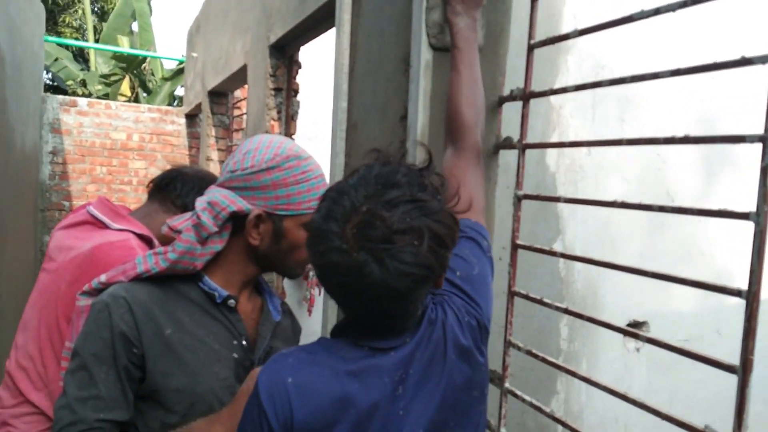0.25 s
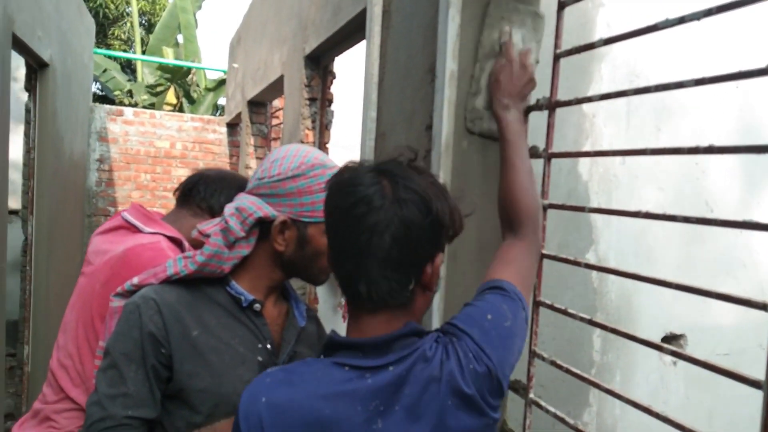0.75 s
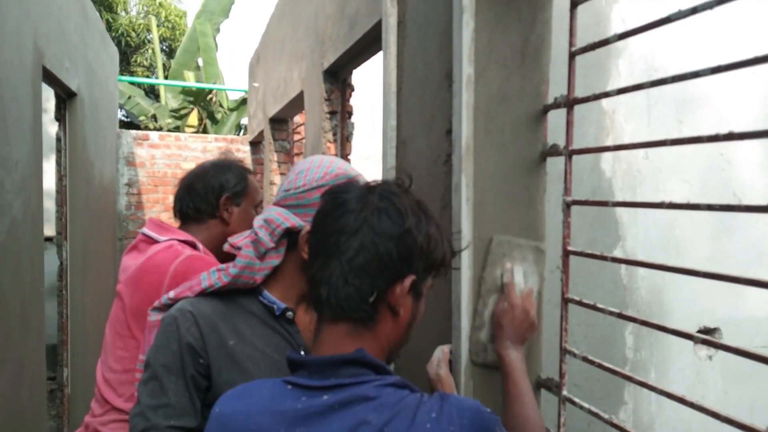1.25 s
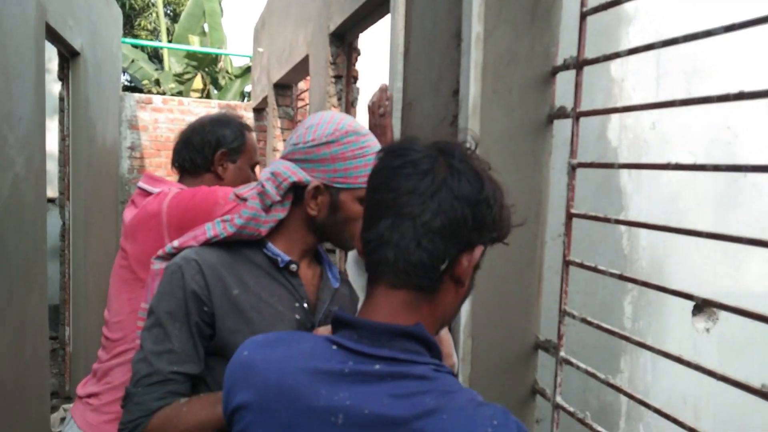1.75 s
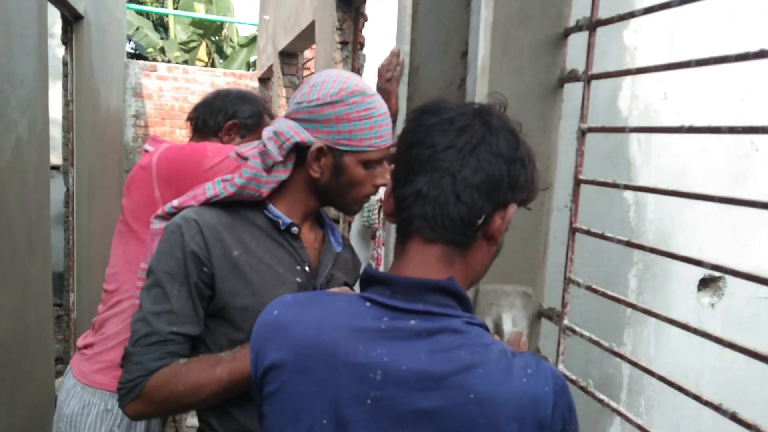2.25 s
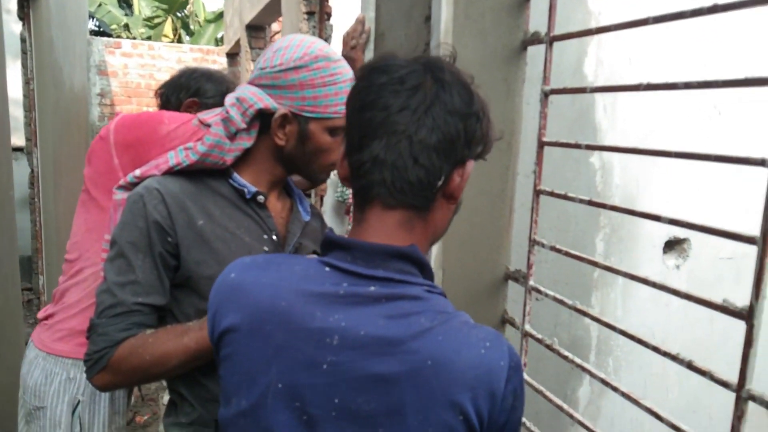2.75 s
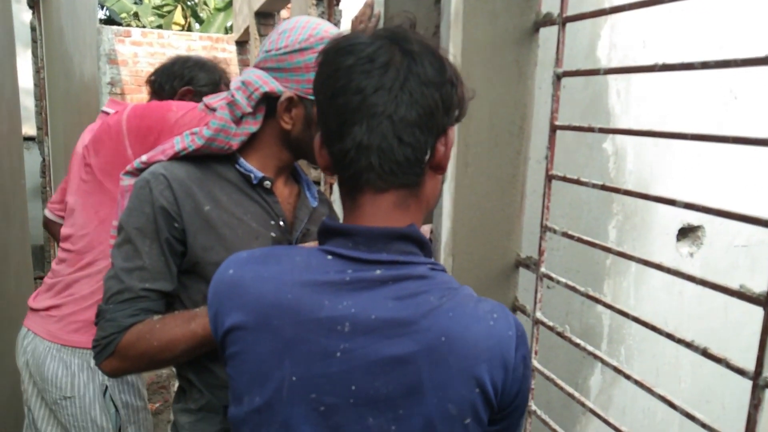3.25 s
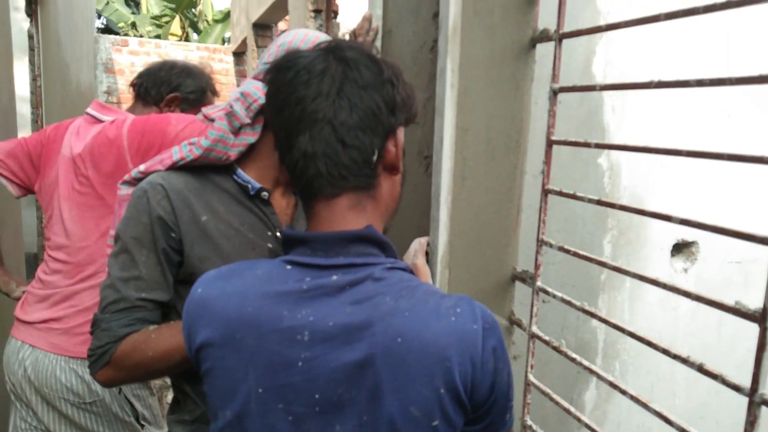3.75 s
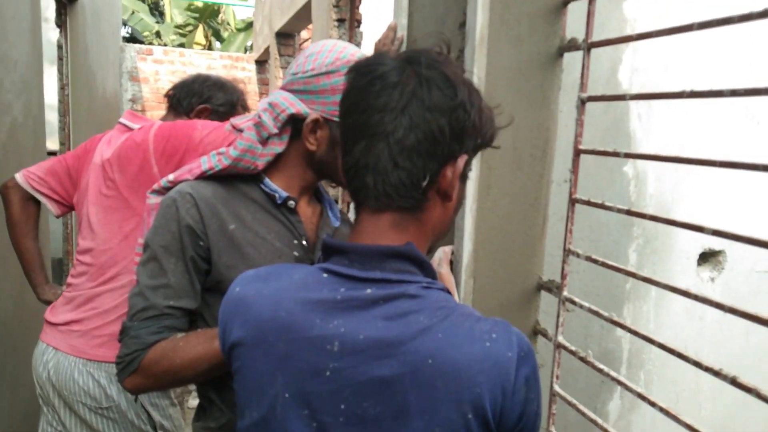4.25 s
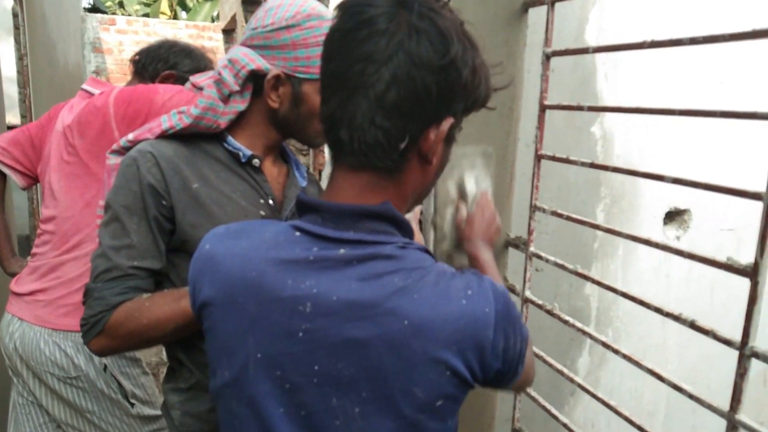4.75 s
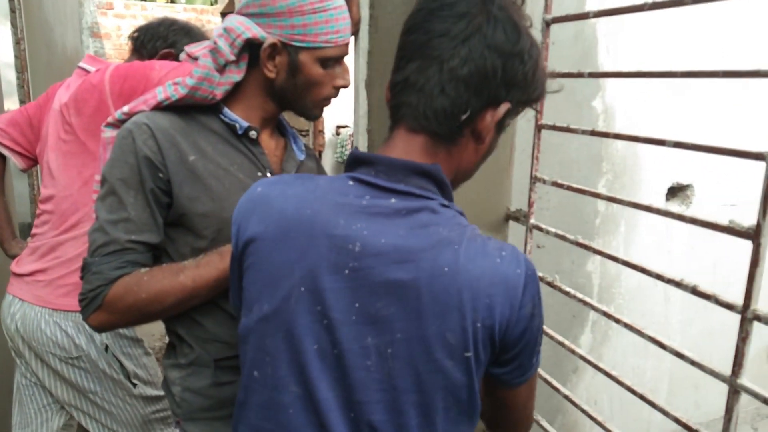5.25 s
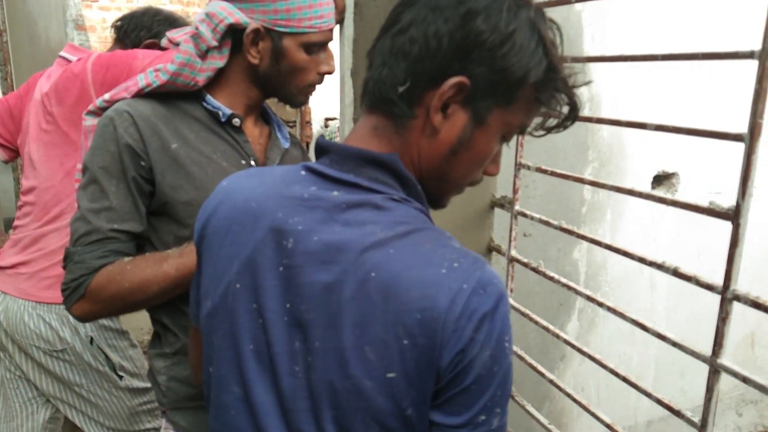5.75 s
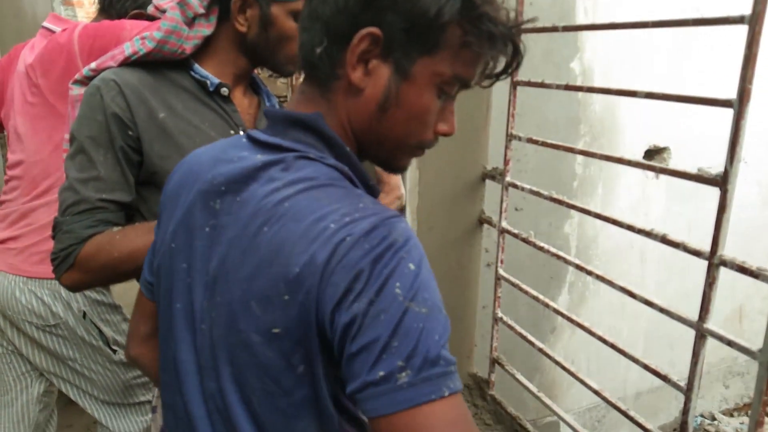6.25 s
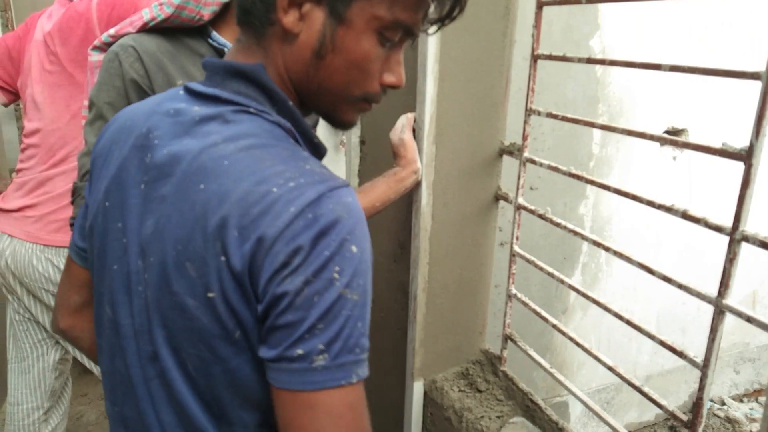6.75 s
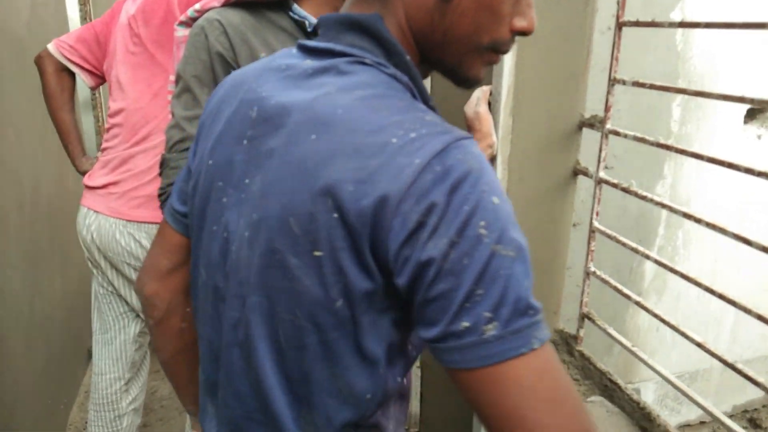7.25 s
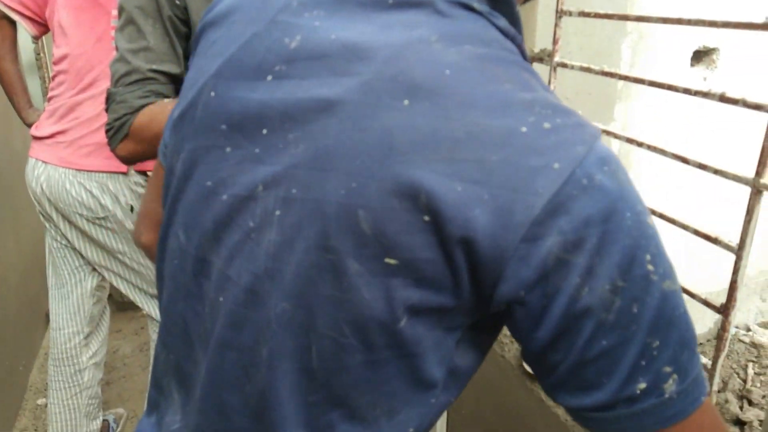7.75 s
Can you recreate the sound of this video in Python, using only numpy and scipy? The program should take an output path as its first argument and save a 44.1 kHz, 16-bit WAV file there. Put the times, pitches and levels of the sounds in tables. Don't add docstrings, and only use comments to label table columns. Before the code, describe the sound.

Bright, hissing scrapes of sand under a thin ringing blade, heard near the microphone with a short bare-wall echo. Pebbles tick early, the strokes smooth out, then turn choppy and grittier with clicking stones. A clear rising bird chirp, soft distant coos and whistles follow as scraping thins. One tool raps a plank, then mortar is scooped with gravelly crunches. Faint regular distant thumps, footfalls and shuffles sit beneath, gated by noise reduction.

```python
import sys
import numpy as np
from scipy import signal
from scipy.fft import rfft, irfft, next_fast_len
from scipy.io import wavfile
from scipy.ndimage import uniform_filter1d, map_coordinates

SR = 44100
rng = np.random.default_rng(int(sys.argv[2]) if len(sys.argv) > 2 else 0)


def convert_level_to_amplitude(level_db):
    exponent = np.asarray(level_db, float) / 20
    return 10 ** exponent


def output_pcm(signal):
    pcm = np.clip(np.atleast_2d(signal).T, -1, 1) * 32767
    wavfile.write(sys.argv[1], SR, np.round(pcm).astype(np.int16))


N = 353152
HISS_DB = -53.5

# freq_hz, level_db_per_hz
HISS_SPECTRUM = [(25, 3.5), (150, -6), (600, -13), (1700, -8.5), (2500, -12.5), (3200, -5.5), (4500, -8.5),
                 (6500, -21.5), (16000, -45)]
# freq_hz, level_db_per_hz
MURMUR_SPECTRUM = [(25, -7.5), (60, 4), (120, -4), (280, -3.5), (400, -18.5), (1200, -23.5), (3000, -78)]
# freq_hz, t60_s
WALL_DECAY = [(200, 0.078), (2000, 0.46), (3800, 0.78), (6000, 0.54), (12000, 0.23)]
# delay_s, level_db
FIRST_RETURNS = [(.009, -10), (.017, -10), (.028, -13), (.041, -15)]

# start_s, slap_db, thump_db
RAMMER = [
    (0, -60.5, -54.5),
    (0.679, -44.5, -49),
    (1.507, -51.5, -48),
    (2.315, -48, -45),
    (3.17, -76, -50.5),
    (3.96, -44, -41.5),
    (4.806, -72, -54),
    (5.612, -46, -44),
    (6.446, -56.5, -52.5),
    (7.275, -82, -53),
]
# start_s, held_s, level_db
LOADS = [
    (1.55, 0.17, -47.5),
    (2.45, 0.24, -45),
    (3.05, 0.092, -55.5),
    (3.4, 0.13, -64),
    (3.76, 0.43, -43.5),
    (4.1, 0.15, -51),
    (6.555, 0.21, -41),
    (6.62, .23, -42),
]
# start_s, held_s, level_db
FOOTFALLS = [
    (.27, 0.15, -49),
    (1.27, 0.099, -59),
    (1.836, .1, -49),
    (3.39, 0.17, -65.5),
    (3.76, 0.31, -45),
    (5.076, 0.049, -52.5),
    (5.891, 0.036, -57),
    (6.1, 0.16, -63),
    (6.555, 0.078, -36),
    (7.159, 0.1, -57),
]
# start_s, held_s, mid_hz, level_db
SHUFFLES_HZ = [(.13, 0.27, 657, -50), (.4, 0.24, 850, -53), (1.03, 0.14, 560, -61.5),
               (0, 0.048, 363, -47.5), (1.95, 0.069, 1180, -62), (3.05, 0.22, 1410, -65),
               (7.27, 0.11, 715, -56.5), (3.55, 0.31, 334, -56), (4.25, 0.085, 337, -55),
               (1.191, 0.26, 666, -57.5), (1.75, 0.85, 614, -64.5), (2.6, 0.079, 565, -57.5),
               (2.9, 0.41, 634, -59.5), (3.35, 0.86, 644, -56.5), (3.55, 1, 714, -53.5),
               (3.76, 0.16, 540, -49.5), (4.12, 0.53, 690, -57.5), (4.553, 0.31, 750, -54.5),
               (4.86, 0.062, 690, -50.5), (5.05, 0.32, 630, -59.5), (5.1, 0.8, 1340, -59),
               (6.041, 0.31, 623, -64.5), (6.38, 0.37, 1190, -59.5), (6.555, 0.042, 750, -35.5),
               (6.6, 0.066, 1510, -57), (6.76, 0.093, 580, -60.5), (6.91, 0.22, 660, -62.5),
               (7.6, 0.18, 790, -58.5)]
# start_s, held_s, mid_hz, level_db
NARROW_BURSTS = [
    (8.1, 0.11, 5740, -63),
    (5.719, 0.32, 2010, -61),
    (7.87, 0.15, 4950, -56),
    (7.93, 0.11, 4500, -58),
    (7.89, .2, 3930, -58.5),
]

# start_s, length_s, start_hz, held_hz, level_db
DOVE_COOS = [
    (4.41, 0.46, 754, 753, -47),
    (5.235, 0.17, 826, 812, -41.5),
    (5.44, 0.17, 762, 783, -47.5),
    (5.735, 0.14, 797, 785, -48),
    (6.03, 0.086, 680, 690, -44.5),
]
# start_s, length_s, start_hz, held_hz, level_db
FAR_WHISTLES = [
    (5.33, 0.21, 2084, 2545, -56.5),
    (5.69, 0.0744, 2605, 2410, -54),
    (5.76, .24, 2400, 2743, -60),
    (5.98, .17, 2990, 3500, -53),
    (6.28, 0.28, 2186, 2667, -57),
    (6.58, 0.15, 2400, 2520, -55),
    (7.12, 0.19, 2650, 3100, -59),
    (7.29, 0.14, 1900, 2350, -60),
    (7.41, 0.2, 2720, 2980, -50.5),
]
# start_s, length_s, start_hz, held_hz, level_db
CHIRPS = [
    (4.795, .105, 3855, 5020, -35.5),
    (5.572, 0.027, 4350, 4680, -40),
    (6.155, .038, 4750, 5000, -43),
    (6.638, 0.032, 4020, 4600, -44),
]
# start_s, length_s, start_hz, held_hz, level_db
ANSWERS = [
    (4.9, 0.11, 3980, 3870, -44),
    (5.608, 0.082, 4530, 3834, -43.5),
    (6.19, 0.092, 4820, 3902, -41),
    (6.678, 0.084, 4580, 3795, -45.5),
]
# start_s, length_s, start_hz, held_hz, level_db
PIPES = [
    (4.525, .06, 3900, 4050, -45),
    (5.556, 0.021, 4000, 5700, -52),
    (7.68, 0.1, 3150, 3420, -46),
]

# start_s, ring_db, crack_db, hardness_hz
CONTACTS = [
    (6.5428, -10, -26, 1000),
    (6.5458, -10, -7, 5040),
    (6.5497, -16, -12, 3000),
]
# freq_hz, level_db, t60_s
PLANK_MODES = [(237, -20.5, 0.037), (447, -18, .04), (530, -11, 0.05), (776, 0, 0.015), (919, -7.5, 0.03),
               (1190, -8, .05), (1357, -2, 0.04), (1540, -1, 0.059), (1900, -15, 0.05), (2290, -13, 0.032)]

# peak_s, peak_db, pitch_hz
STONE_HITS = [(0.769, -23, 5050), (0.8724, -40, 4290), (2.607, -39, 2900), (2.9165, -39, 4690),
              (3.236, -40, 3570), (3.269, -31, 3800), (3.3021, -29, 5840), (3.6653, -32, 3660),
              (4.0659, -36, 5430), (4.1956, -23, 5290), (4.433, -39, 3540), (4.5557, -33, 4000),
              (4.6266, -23, 3740), (4.695, -27, 4420), (4.7033, -26, 4480), (4.857, -33, 4300),
              (4.897, -31.5, 3600), (6.0392, -45, 2730), (6.0703, -29, 3060), (6.075, -28, 3060),
              (6.11, -34.5, 2900), (6.5195, -31, 1600), (1.49, -32, 3400), (1.52, -34, 3310),
              (.1848, -33, 5310), (.2117, -29, 6060), (.2135, -28, 5000), (.2422, -23.5, 5290),
               (.2455, -23, 5700), (.251, -25, 5600), (.294, -30, 5500), (.298, -20, 5820),
               (.2992, -15, 5600), (.3032, -17.5, 5900), (.315, -24, 5800), (.3325, -29, 5500),
               (.3362, -21, 5400), (.338, -17, 5400), (.342, -21, 5800), (.344, -22, 6000),
               (.3533, -26, 7000), (.374, -29, 5000), (.4282, -26.5, 5360), (.4475, -34, 5920)]
# peak_s, peak_db, pitch_hz
GRAVEL_HITS = [(6.9062, -27.5, 5140), (6.9282, -24.5, 4800), (6.9437, -27, 5220), (6.9588, -15, 4200),
               (6.963, -24, 5230), (6.981, -26, 3000), (6.9855, -25, 2700), (6.994, -24, 3000),
               (6.9991, -24, 3820), (7.0022, -20.5, 3900), (7.009, -23, 4500), (7.017, -20.5, 4400),
               (7.024, -25, 5000), (7.0315, -12.5, 5100), (7.0345, -16.5, 5000), (7.0398, -15.5, 5200),
               (7.0425, -18, 5300), (7.049, -25, 5200), (7.06, -26, 4000), (7.5142, -35, 3130),
               (7.5626, -28, 3010), (7.585, -28, 4300), (7.6174, -24, 4820), (7.6224, -21, 4100),
               (7.64, -23, 5370), (7.66, -25, 4600), (7.69, -28, 2150), (7.8424, -46, 3430)]
# freq_hz, width_hz, level_db
WALL_BLADE_MODES = [(1800, 250, -9), (3600, 300, -7), (5400, 250, 0), (5950, 300, -2), (7350, 300, -3)]
# freq_hz, width_hz, level_db
HEAP_BLADE_MODES = [(2160, 120, -8), (2930, 150, -7), (3850, 200, -6), (4580, 200, -5), (5210, 110, 2),
                    (7300, 250, -8)]

# freq_hz, level_db_per_hz
SAND_SPECTRUM = [(530, -17), (900, -5.5), (1020, -14.5), (2140, -10), (2890, -1), (3150, -1.5), (4800, 3),
                 (6640, 0.5), (7960, -5.5), (15100, -21.5), (16000, -20.5)]
# freq_hz, width_hz, level_db
SAND_BLADE_MODES = [(2154, 20, 2), (2990, 13, -1.5), (3600, 21, -21.5), (4350, 200, -34), (5280, 20, 0.5),
                    (7320, 280, -10.5)]
# peak_s, rise_s, fall_s, blade_db, slurry_over_blade_db
FLAT_STROKES = [(.1, 0.13, 0.61, -47.5, -12.5), (.5, .08, 0.39, -48, -6.5), (.772, 0.015, 0.12, -43, -8.5),
                (.875, .015, 0.21, -43.5, -12), (1.1, 0.31, 0.08, -45, -5.5),
                (1.34, 0.28, 0.23, -43.5, -7.5), (1.52, 0.22, 0.12, -41.5, -12.5),
                (1.76, 0.2, 0.11, -45.5, -27), (1.94, 0.06, 0.16, -42.5, -24),
                (2.19, 0.12, 0.18, -41.5, -17.5), (2.3, 0.1, 0.21, -43.5, -10.5),
                (2.62, 0.16, 0.29, -39.5, -15), (2.92, 0.025, 0.39, -43.5, -19),
                (3.14, 0.25, 0.13, -47, -21), (5.02, .06, 0.088, -55.5, -30), (5.21, 0.11, 0.14, -44, -18),
                (5.43, 0.26, 0.13, -48, -10)]
# peak_s, rise_s, fall_s, blade_db, slurry_over_blade_db
EDGE_STROKES = [(3.303, 0.0028, 0.13, -42.5, -12.5), (3.38, 0.053, 0.13, -44, -9.5),
                (3.58, 0.11, 0.058, -41.5, -4), (3.71, 0.077, 0.16, -41, -5.5),
                (3.84, 0.046, 0.21, -49, -15), (3.964, 0.016, 0.15, -46, -5.5),
                (4.17, 0.12, 0.38, -45, -11), (4.359, 0.42, 0.14, -46, -7.5),
                (4.565, 0.023, 0.18, -44, -16), (4.69, 0.084, 0.12, -44.5, -4),
                (4.87, 0.056, 0.093, -44, -9)]
# peak_s, rise_s, fall_s, blade_db, slurry_over_blade_db
SCOOP_STROKES = [(5.62, 0.054, 0.11, -60.5, 2), (5.95, 0.12, 0.11, -56.5, -27), (6.701, .12, .1, -59, -12),
                 (6.08, 0.035, 0.08, -46, -7.5), (6.22, 0.037, 0.13, -52, -4),
                 (6.82, 0.055, 0.091, -51.5, -12), (6.95, 0.028, 0.055, -45.5, -3),
                 (7.02, 0.09, 0.065, -36, -8), (7.15, 0.072, 0.043, -56.5, -5),
                 (7.24, .08, 0.052, -65, -30), (7.32, 0.026, 0.19, -55, -15), (7.5, 0.12, 0.1, -50.5, -33),
                 (7.648, 0.084, 0.061, -35.5, -6.5), (7.78, 0.089, 0.062, -56, -2)]
# peak_s, rise_s, fall_s, blade_db, slurry_over_blade_db
STONY_STROKES = [
    (.21, 0.03, .025, -53, -1),
    (.248, 0.012, 0.033, -47, -1),
    (.32, 0.035, 0.07, -48, -4),
    (.435, 0.012, 0.046, -55, -5),
]
# grit_over_blade_db, fizz_over_blade_db
GRIP_LEVELS = [
    (-8.5, -17),
    (-3, -11),
    (-9, -16.5),
    (3.5, 1),
]


def unit(x):
    return x / np.sqrt(np.mean(x ** 2) + 1e-20)


def along(points, hz):
    f, v = np.transpose(points)
    return np.interp(np.log(hz + 1), np.log(f + 1), v)


def wobble(rate_hz, count=N):
    knots = rng.standard_normal(int(count * rate_hz / SR) + 4)
    coarse = map_coordinates(knots, [np.arange(0, count + 32, 32) * rate_hz / SR])
    return np.interp(np.arange(count) / 32, np.arange(len(coarse)), coarse)


def filtered(x, response):
    m = next_fast_len(len(x) + min(len(x), SR // 4))
    return irfft(rfft(x, m) * response(np.fft.rfftfreq(m, 1 / SR)), m)[:len(x)]


def band(hz, low_hz, high_hz, order):
    return 1 / np.sqrt((1 + (low_hz / (hz + 1)) ** order) * (1 + (hz / high_hz) ** order))


def resonance(hz, mode_hz, width_hz):
    return 1j * hz * width_hz / (mode_hz ** 2 - hz ** 2 + 1j * hz * width_hz)


def patchy(x, depth_db, bins, frames):
    z = signal.stft(x, nperseg=512)[2]
    field = uniform_filter1d(rng.standard_normal(z.shape), bins, 0)
    field = uniform_filter1d(field, frames, 1)
    return signal.istft(z * convert_level_to_amplitude(depth_db * unit(field)), nperseg=512)[1][:N]


def shaped_noise(spectrum):
    return unit(filtered(rng.standard_normal(N), lambda f: convert_level_to_amplitude(along(spectrum, f))))


def walls(x):
    hz, t, z = signal.stft(rng.standard_normal(SR // 2), SR, nperseg=256)
    decay = convert_level_to_amplitude(-60 * t / along(WALL_DECAY, hz)[:, None])
    tail = signal.istft(z * decay, SR, nperseg=256)[1]
    return signal.fftconvolve(np.pad(x, (300, 0)), tail / np.linalg.norm(tail))[:N]


def site_bursts():
    rows = []
    for s, slap_db, thump_db in RAMMER:
        rows += [(s, 0.15, 340, 1215, slap_db), (s, 0.13, 163, 295, thump_db)]
    rows += [(s, held_s, 43, 200, db) for s, held_s, db in LOADS]
    rows += [(s, held_s, 125, 345, db) for s, held_s, db in FOOTFALLS]
    for table, span in ((SHUFFLES_HZ, 1.427), (NARROW_BURSTS, 1.03)):
        rows += [(s, held_s, hz / span, hz * span, db) for s, held_s, hz, db in table]
    return rows


def site():
    out, t = np.zeros(N + SR), np.arange(SR * 3 // 4) / SR
    for s, held_s, low_hz, high_hz, db in site_bursts():
        tilt = lambda f: band(f, low_hz, high_hz, order=24) / (f + 100) ** 0.76
        noise = unit(filtered(rng.standard_normal(len(t)), tilt))
        sag_db = -7 * np.minimum(t / held_s, 1)
        close_db = -140 * np.maximum(t - held_s, 0)
        gate = (1 - np.exp(-t / 0.0067)) * convert_level_to_amplitude(sag_db + close_db)
        out[round(s * SR):][:len(t)] += convert_level_to_amplitude(db) * gate * noise
    thuds = patchy(out[:N], depth_db=2.5, bins=2, frames=10)
    hiss = patchy(shaped_noise(HISS_SPECTRUM), depth_db=1.4, bins=3, frames=30)
    return thuds + convert_level_to_amplitude(HISS_DB) * hiss


def phrases(rows, peak_share, end_ratio, start_db, end_db):
    out = []
    for s, length_s, start_hz, hz, db in rows:
        peak_s = peak_share * length_s
        bend_hz = start_hz + 0.8 * (hz - start_hz)
        out.append([(s, start_hz, db + start_db), (s + peak_s * 2 / 3, bend_hz, db),
                    (s + peak_s, hz, db), (s + length_s, hz * end_ratio, db + end_db)])
    return out


def notes(tables, blur, flutter_db, overtone_db, edge_s):
    out = np.zeros(N)
    for rows in tables:
        s, hz, db = np.transpose(rows)
        start, stop = round(s[0] * SR), min(N, round(s[-1] * SR))
        t = np.arange(start, stop) / SR
        pitch_hz = np.interp(t, s, hz) * (1 + blur * wobble(140, count=len(t)))
        phase = 2 * np.pi * np.cumsum(pitch_hz) / SR
        fade = np.clip(np.minimum(t - t[0], t[-1] - t) / edge_s, 0, 1)
        level_db = np.interp(t, s, db) + 0.5 + flutter_db * wobble(70, count=len(t))
        tone = np.sin(phase) + convert_level_to_amplitude(overtone_db) * np.sin(2 * phase)
        out[start:stop] += convert_level_to_amplitude(level_db) * fade * tone
    return out


def dove():
    coos = phrases(DOVE_COOS, peak_share=0.2, end_ratio=0.97, start_db=1, end_db=-13)
    return notes(coos, blur=0.012, flutter_db=4.5, overtone_db=-30, edge_s=0.025)


def far_birds():
    rises = phrases(FAR_WHISTLES, peak_share=0.7, end_ratio=1.04, start_db=1, end_db=-4.5)
    return notes(3 * rises, blur=0.03, flutter_db=4.5, overtone_db=-40, edge_s=0.025)


def near_bird():
    song = phrases(CHIRPS, peak_share=0.5, end_ratio=0.945, start_db=-15, end_db=-8)
    song += phrases(ANSWERS, peak_share=0.12, end_ratio=0.965, start_db=-12, end_db=-8)
    song += phrases(PIPES, peak_share=0.7, end_ratio=1.04, start_db=-10, end_db=-6)
    direct = notes(song, blur=0.006, flutter_db=3, overtone_db=-38.5, edge_s=0.003)
    return direct + sum(convert_level_to_amplitude(db) * np.roll(direct, round(s * SR)) for s, db in FIRST_RETURNS)


def dulled(x):
    return filtered(x, lambda f: (1 / (1 - (f / 7000) ** 2 + 1j * f / 6000)) ** 2)


def knock():
    rest_s, rest_db, rest_fade_s = 6.5545, -13, 0.002
    out, t = np.zeros(N + SR), np.arange(SR // 5) / SR
    for s, ring_db, crack_db, hardness_hz in CONTACTS:
        ring = np.zeros(len(t))
        for hz, db, t60_s in PLANK_MODES:
            drive = 1 / (1 + (hz / hardness_hz) ** 4)
            ring += drive * convert_level_to_amplitude(db - 60 * t / t60_s) * np.sin(2 * np.pi * hz * t)
        ring *= convert_level_to_amplitude(rest_db * np.clip((s + t - rest_s) / rest_fade_s, 0, 1))
        ring *= 1 - np.exp(-t / 0.00089)
        puff = rng.standard_normal(len(t)) * (convert_level_to_amplitude(-60 * t / 0.014) + convert_level_to_amplitude(-15.5 - 60 * t / 0.12))
        crack = filtered(puff, lambda f: 1 / (1 + 1j * f / 3300) ** 2)
        out[round(s * SR):][:len(t)] += convert_level_to_amplitude(ring_db) * ring + convert_level_to_amplitude(crack_db) * crack
    return dulled(out[:N])


def stones():
    out, t = np.zeros(N + SR), np.arange(SR // 16) / SR
    hits = [(row, WALL_BLADE_MODES) for row in STONE_HITS]
    hits += [(row, HEAP_BLADE_MODES) for row in GRAVEL_HITS]
    for (s, peak_db, pitch_hz), modes in hits:
        blow = rng.standard_normal(len(t)) * (convert_level_to_amplitude(-60 * t / 0.01) + convert_level_to_amplitude(-14 - 60 * t / 0.045))
        blow[1] = 5
        gains = [2.5 * convert_level_to_amplitude(db + rng.normal(0, 3)) for _, _, db in modes]

        def response(f):
            stone = resonance(f, pitch_hz, 900) + 0.45 * resonance(f, 4000, 5000)
            return stone + sum(g * resonance(f, hz, width) for g, (hz, width, _) in zip(gains, modes))

        burst = filtered(blow, response)
        out[round(s * SR):][:len(t)] += convert_level_to_amplitude(peak_db) * burst / np.abs(burst).max()
    return dulled(out[:N])


def pressures():
    t, power = np.arange(0, N + 64, 64) / SR, 0
    grips = (FLAT_STROKES, EDGE_STROKES, SCOOP_STROKES, STONY_STROKES)
    for strokes, (grit_db, fizz_db) in zip(grips, GRIP_LEVELS):
        for s, rise_s, fall_s, blade_db, wet_db in strokes:
            away = np.maximum(s - t, 0) / rise_s + np.maximum(t - s, 0) / fall_s
            fade_db = 10 * away ** 1.5
            layers_db = np.array([wet_db - 1.15 * fade_db, -fade_db,
                                  grit_db - 0.95 * fade_db, fizz_db - 1.03 * fade_db])
            power = power + convert_level_to_amplitude(blade_db + layers_db) ** 2
    return [np.interp(np.arange(N) / SR, t, np.sqrt(p)) for p in power]


def trowel():
    slurry, blade, grit, fizz = pressures()
    grain_size = convert_level_to_amplitude(1.3 * np.minimum(rng.exponential(1, N), 4))
    slips = (rng.random(N) < 0.08) * grain_size * rng.standard_normal(N)
    clumps = convert_level_to_amplitude(1.1 * wobble(30) + 1.5 * wobble(120))
    rub = (unit(slips) + 1.3 * rng.standard_normal(N)) * clumps
    rub = patchy(rub, depth_db=1.5, bins=5, frames=12)

    def steel(f):
        ring = 1 + sum(convert_level_to_amplitude(db) * resonance(f, hz, width) for hz, width, db in SAND_BLADE_MODES)
        return convert_level_to_amplitude(along(SAND_SPECTRUM, f)) * ring

    sand = filtered(rub, steel)

    def layer(low_hz, high_hz):
        return unit(filtered(sand, lambda f: band(f, low_hz, high_hz, order=16)))

    low = slurry * layer(1122, 2026) + blade * layer(2350, 4433)
    return low + grit * layer(5650, 6090) + fizz * layer(7840, 18000)


def scene():
    coos, far, near = dove(), far_birds(), near_bird()
    hit, grit = knock(), stones()
    birds_to_walls = convert_level_to_amplitude(-9) * near + convert_level_to_amplitude(-3.5) * far + convert_level_to_amplitude(-11) * coos
    echo = walls(birds_to_walls + convert_level_to_amplitude(-15.5) * hit + convert_level_to_amplitude(-14) * grit)
    birds = 1.2 * near + 0.3 * far + 0.44 * coos
    return (trowel() + grit + hit + birds + echo + site())[None]


def denoise(x, floor_db):
    hz, _, z = signal.stft(x, SR, nperseg=1024)
    power = uniform_filter1d(np.abs(z) ** 2, size=5, axis=0)
    power = uniform_filter1d(power, size=7, axis=1)
    steady = convert_level_to_amplitude(along(HISS_SPECTRUM, hz)) ** 2
    steady = steady / steady.sum() * convert_level_to_amplitude(HISS_DB) ** 2
    gain = np.maximum(1 - steady[:, None] / (np.abs(power) + 1e-20), convert_level_to_amplitude(floor_db))
    return signal.istft(z * gain, SR, nperseg=1024)[1][:N]


def band_limit(x):
    return signal.sosfilt(signal.butter(12, 16410, fs=SR, output="sos"), x)


def record(dry):
    murmur = patchy(shaped_noise(MURMUR_SPECTRUM), depth_db=2.27, bins=2, frames=14)
    clean = denoise(dry[0], floor_db=-25.5) + convert_level_to_amplitude(-76) * murmur
    mix = filtered(clean, lambda hz: (hz < 15780) * (1j * hz / (70 + 1j * hz)) ** 2)
    return band_limit(mix[None])


dry = scene()
out = record(dry)
output_pcm(out)
```